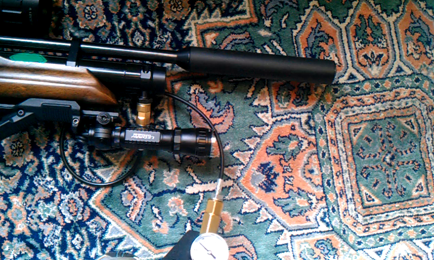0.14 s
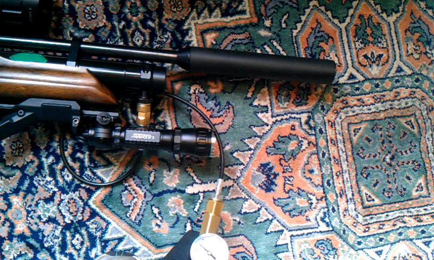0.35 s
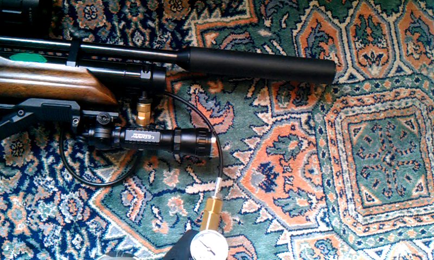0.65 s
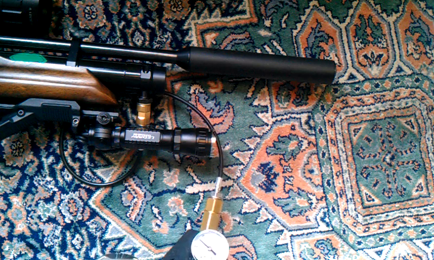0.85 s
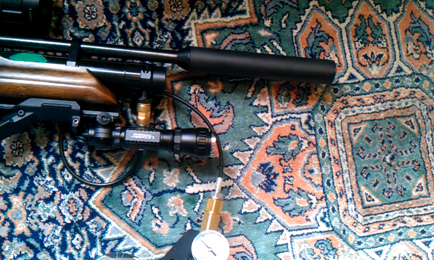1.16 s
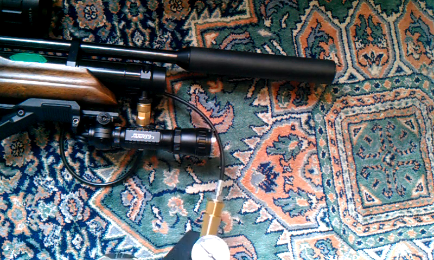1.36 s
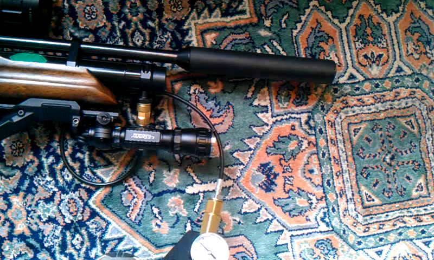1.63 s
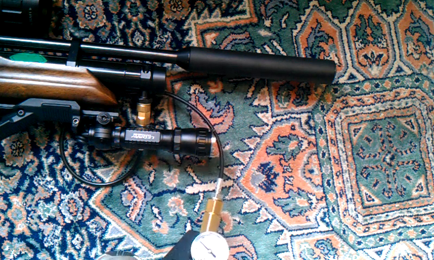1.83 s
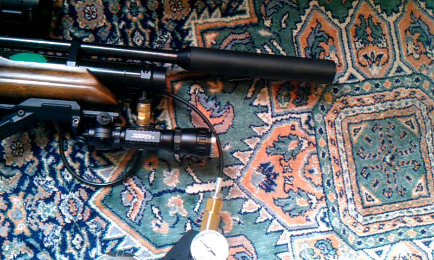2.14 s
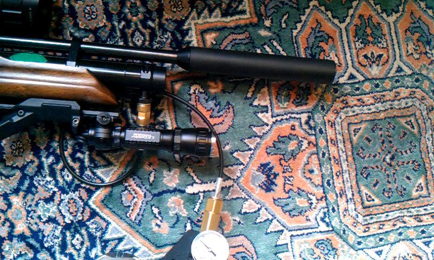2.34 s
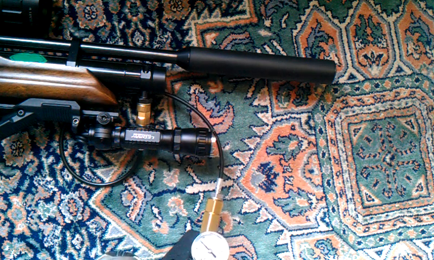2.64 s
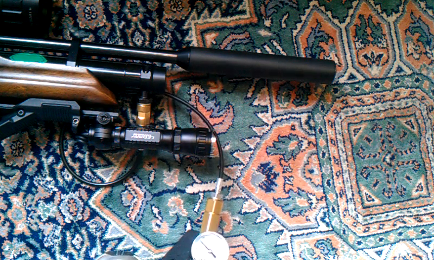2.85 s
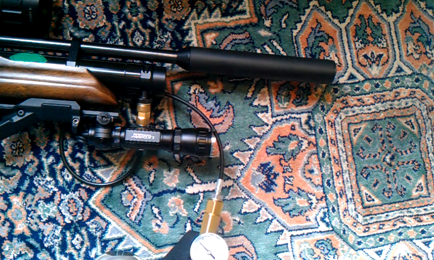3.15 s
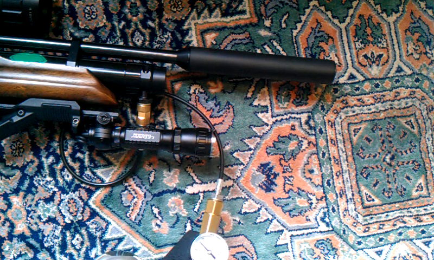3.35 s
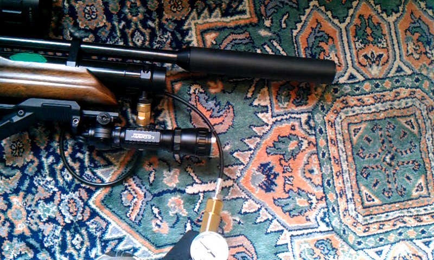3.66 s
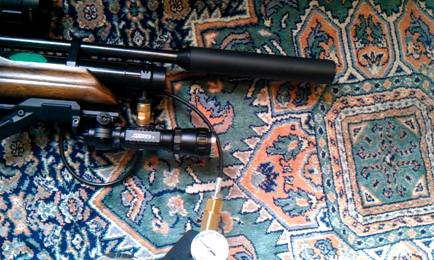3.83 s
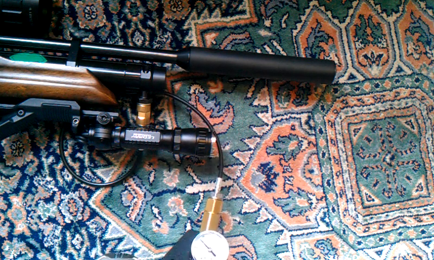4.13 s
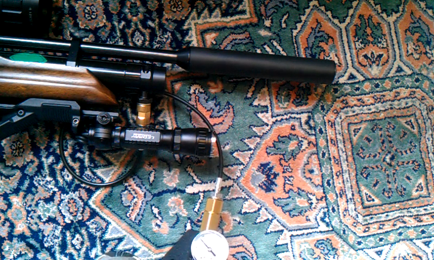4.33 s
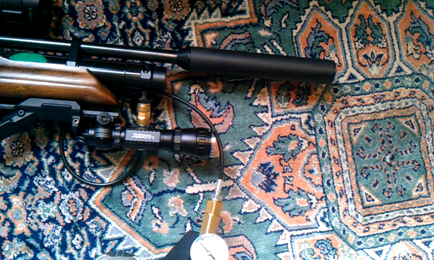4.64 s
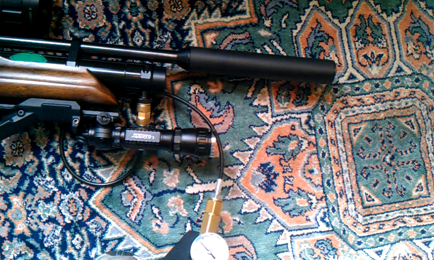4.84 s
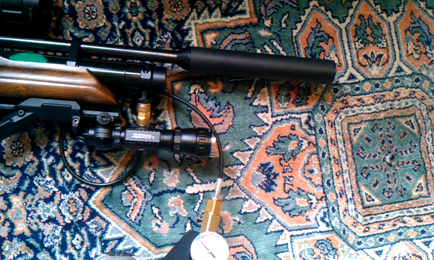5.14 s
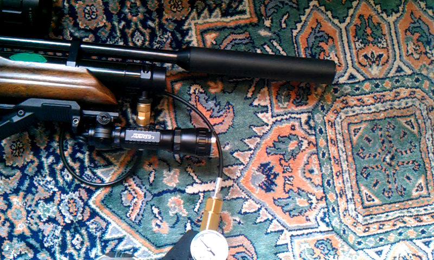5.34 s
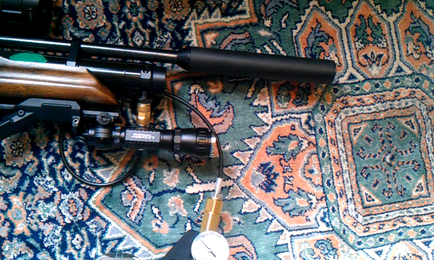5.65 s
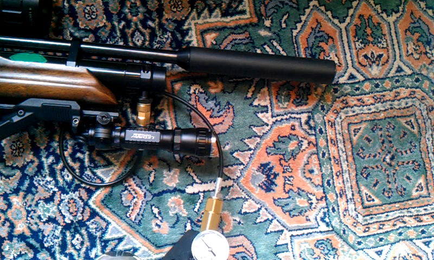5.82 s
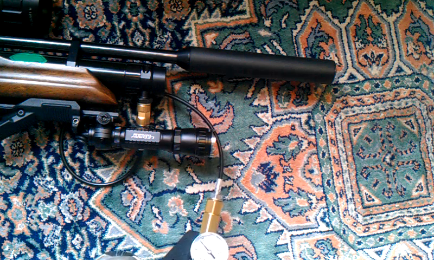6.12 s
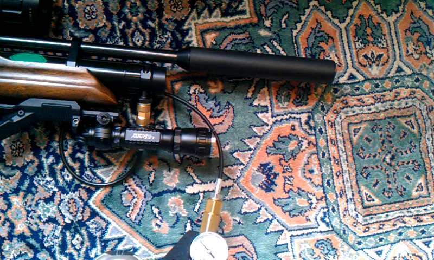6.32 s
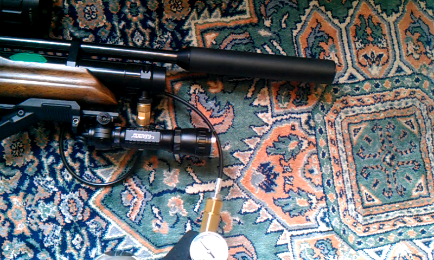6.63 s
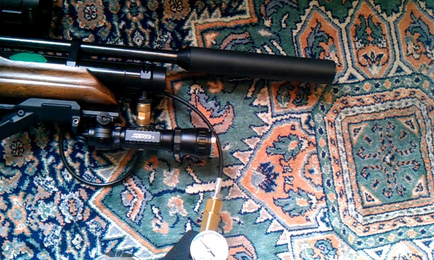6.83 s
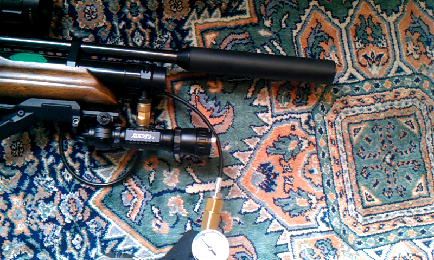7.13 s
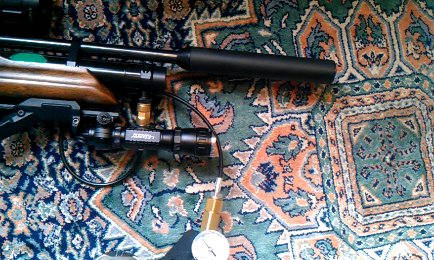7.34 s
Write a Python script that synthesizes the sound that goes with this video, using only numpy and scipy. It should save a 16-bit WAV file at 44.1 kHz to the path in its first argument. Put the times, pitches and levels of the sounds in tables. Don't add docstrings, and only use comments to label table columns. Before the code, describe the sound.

Close up in a carpeted room, a high-pressure hand pump is worked at an even pace. It begins already mid-pull with a rush of intake air. After a quiet pause the push gives a high chirp, a rubbery squeak and a low thump on the floor. Then a valve clacks and bright air hisses again. Five pulls and five pushes follow this cycle, with faint seal rubbing, small ticks and low room rumble between.

```python
import sys
import numpy as np
from scipy import signal
from scipy.fft import rfft, irfft
from scipy.io import wavfile
from scipy.ndimage import uniform_filter1d

SR = 44100
rng = np.random.default_rng(int(sys.argv[2]) if len(sys.argv) > 2 else 0)


def ratio(d):
    e = np.asarray(d, float) / 20
    return 10 ** e


def bounce(signal):
    frames = np.transpose(np.atleast_2d(signal))
    limited = np.clip(frames, -1, 1)
    pcm = np.round(limited * 32767).astype(np.int16)
    wavfile.write(sys.argv[1], SR, pcm)


N = 329868
T = np.arange(N) / SR
SHUT_S = 0.025

# valve opens [t/s], handle tops out [t/s], strength [level/dB], pace [1 = usual]
PULLS = [(-0.11, 0.387, 0.5, 1.042), (1.451, 1.967, 0, 0.98), (3.029, 3.529, 0.5, 1.078),
         (4.585, 5.072, 0.5, 0.99), (6.134, 6.689, 0.5, 1.043)]
# seal breaks loose [t/s], handle bottoms out [t/s], rub [level/dB], dull rub at the bottom [level/dB]
PUSHES = [(1.006, 1.254, -46.5, -45.5), (2.57, 2.83, -47.5, -45.5), (4.133, 4.381, -47, -41),
          (5.673, 5.92, -48, -46.5), (7.258, 7.51, -47, -45)]
# [f/Hz], [level/dB], decay [t60/s]
HOUSING = [(289, -1, 0.12), (377, 18, 0.011), (503, 2, 0.042), (640, -1.5, 0.038)]


def rms_one(x):
    return x / np.sqrt(np.mean(x ** 2) + 1e-20)


def band(x, low_hz, high_hz):
    edges_hz = [low_hz, min(high_hz, .45 * SR)]
    return signal.sosfilt(signal.butter(2, edges_hz, "band", fs=SR, output="sos"), x)


def above(x, hz):
    return signal.sosfilt(signal.butter(2, hz, "high", fs=SR, output="sos"), x)


def drift(rate_hz):
    r = np.exp(-40 * np.pi * rate_hz / SR)
    draws = rng.standard_normal(N // 20 + 2002)
    slow = signal.lfilter([1], [1, -2 * r, r * r], draws)[2000:]
    return np.interp(np.arange(N) / 20, np.arange(len(slow)), rms_one(slow))


def coloured(points):
    hz = np.maximum(np.arange(N // 2 + 1) * SR / N, 1)
    point_hz, point_db = np.transpose(points)
    shape = ratio(np.interp(np.log(hz), np.log(point_hz), point_db))
    return rms_one(irfft(rfft(rng.standard_normal(N)) * shape, N))


def whistle(peaks):
    out = 0
    for hz, width_hz, level_db in peaks:
        r = np.exp(-np.pi * width_hz / SR)
        resonance = [1, -2 * r * np.cos(2 * np.pi * hz / SR), r * r]
        tone = signal.lfilter([1, 0, -1], resonance, rng.standard_normal(N))
        out = out + ratio(level_db + 3.0 * drift(10)) * rms_one(tone)
    return out


def strike(events, modes, spread_db, soft_hz, bounces=((0, 0),)):
    out = np.zeros(N)
    for k, (hz, level_db, t60) in enumerate(modes):
        clicks = np.full(N, 1e-18)
        for lag, lag_db in bounces:
            at = np.round((events[:, 0] + lag) * SR).astype(int)
            chance_db = spread_db * rng.standard_normal(len(at))
            clicks[at] += ratio(events[:, 1] + level_db + lag_db + chance_db)
        r, w = ratio(-60 / (t60 * SR)), 2 * np.pi * hz / SR
        ringing = signal.lfilter([0, np.sin(w)], [1, -2 * r * np.cos(w), r * r], clicks)
        sign = -1 if hz > 1000 and k % 2 else 1
        out += sign * ringing
    soft = np.exp(-2 * np.pi * soft_hz / SR)
    return signal.lfilter([1 - soft], [1, -soft], out)


def in_time(tables):
    s, *columns = np.transpose(np.concatenate(tables))
    gate = sum((T >= rows[0][0]) * (T < rows[-1][0]) for rows in tables)
    curves = [uniform_filter1d(np.interp(T, s, c), size=220) for c in columns]
    return uniform_filter1d(gate * 1., size=220), curves


def pull(start, stop, db, pace):
    # after the valve [t/s], [level/dB]
    flow = [(0, -27), (.01, -37), (.06, -26), (.12, -18.5), (.2, -17.5), (.3, -20.5), (.4, -26), (.5, -35),
            (.6, -46)]
    after, shape_db = np.transpose(flow)
    s = start + after / pace
    s = np.append(s[s < stop], [stop, stop + SHUT_S])
    flow_db = np.interp((np.minimum(s, stop) - start) * pace, after, shape_db)
    core_db = db + flow_db - 463 * np.maximum(s - stop, 0)
    under = flow_db + 17
    lows_db = -18 + (0.31 - 1) * under
    highs_db = -3.5 + (1.06 - 1) * under
    nozzle_db = -13 + (0.73 - 1) * under
    return np.transpose([s, core_db, lows_db, highs_db, nozzle_db])


def jet():
    # [f/Hz], [level/dB per Hz]
    jet_colour = [(150, -92), (250, -25.5), (662, -16.5), (816, -16), (1140, -11), (2130, -10), (2760, -8),
                  (3460, -8), (4900, -3.5), (8550, -3.5), (16000, -25)]
    gate, (core_db, lows_db, highs_db, nozzle_db) = in_time([pull(*row) for row in PULLS])
    air = coloured(jet_colour)
    lows = signal.sosfilt(signal.butter(2, 2700, fs=SR, output="sos"), air)
    highs = above(air, 10300)
    mix = rms_one(air - lows - highs) * ratio(0.81 * drift(2.2))
    mix += rms_one(lows) * ratio(lows_db + 1.1 * drift(12))
    mix += rms_one(highs) * ratio(highs_db + .9 * drift(12))
    mix += ratio(nozzle_db) * whistle([(7500, 650, 0)])
    eddies_db = 0.34 * drift(12.0)
    return gate * ratio(core_db + eddies_db) * mix


def clacks():
    # [t/s], crack [peak level/dB], body [level/dB]
    snaps = [
        (1.4505, -9.5, -45),
        (3.024, -8.5, -44.5),
        (4.585, -9, -45.5),
        (6.129, -10.5, -45.5),
    ]
    # [f/Hz], [level/dB], decay [t60/s]
    valve_modes = [(1120, -12, .01), (2100, -8, .006), (3000, -9, .006), (4420, -9, .007), (5200, -6, .007),
                   (6500, -6, .008), (7400, -1, .008), (8300, -5, .006), (10300, -6, .006),
                   (12600, -10, .005), (14800, -13, .004)]
    rows = np.array(snaps)
    ragged = ((-.0007, -39), (-.0003, -7), (.0002, 8), (.0027, -7))
    crack = strike(rows, valve_modes, 3.0, 15000, ragged)
    body = strike(rows[:, [0, 2]] - [.0018, 0], HOUSING, 1, 1100)
    return ratio(-10) * crack + ratio(10.5) * above(body, 108.8)


def handle():
    # [t/s], [peak level/dB]
    thumps = [(1.251, -26.5), (2.821, -24), (4.361, -21), (5.901, -25)]
    # [f/Hz], [level/dB], decay [t60/s]
    floorboards = [(33, -5, 0.56), (71.5, -4, 0.31), (111.6, -19, 0.22), (140, -2.5, 0.11), (189, 0, 0.036),
                   (313, -15.5, 0.059), (446, -13.5, 0.13), (556, -2.5, 0.036), (680, -27, 0.089)]
    # [t/s], [peak level/dB]
    stops = [(0.366, -30), (1.966, -34), (3.525, -38), (6.683, -37)]
    # [t/s], [level/dB]
    groans = [(1.07, -38.5), (2.633, -42), (4.198, -56), (5.742, -51.5), (7.29, -43)]
    rattle = ((0, -1.5), (.008, -18), (.019, -0.5), (.027, -18), (.055, -42))
    down = strike(np.array(thumps), floorboards, 2.5, 900, rattle)
    shudder = ((0, -13.5), (.02, -11), (.04, -26))
    load = strike(np.array(groans), [(160, 0, 0.27)], 1.9, 300, shudder)
    clatter = ((0, 0), (.005, -4), (.013, -7), (.03, -12))
    knock = above(strike(np.array(stops), HOUSING, 2.5, 900, clatter), 170)
    sway = strike(np.array(stops), floorboards[:2], 0.95, 58, ((.05, 1), (.12, -5), (.2, -6.5)))
    return ratio(-7.0) * down + load + ratio(-8.5) * knock + ratio(-14.5) * sway


def stick_slip(tables, wobble, rough, extra, scratch_db):
    gate, (hz, *levels_db) = in_time(tables)
    on = gate > 0
    phase = (2 * np.pi * np.cumsum(hz * (1 + wobble * drift(42.5))) / SR)[on]
    mean_db = np.mean(levels_db, axis=0)[on]
    scratch = rms_one(band(rng.standard_normal(N), 2040, 6400))[on]
    out = ratio(mean_db + scratch_db) * scratch
    lines = [(k + 1, db[on]) for k, db in enumerate(levels_db)]
    lines += [(k, mean_db + db) for k, db in extra]
    for k, db in lines:
        blur = rough * np.sqrt(k)
        slips = (1 + blur * drift(49)[on]) * np.sin(k * phase + k)
        slips += blur * drift(73)[on] * np.cos(k * phase + k)
        out += ratio(db + 1.5 * drift(20)[on]) * slips / np.sqrt(.5 + blur ** 2)
    gate[on] *= out
    return gate


def outer_seal():
    # [t/s], [f/Hz], length [s], [level/dB], third partial at its top [level/dB]
    chirps = [(1.008, 1867, 0.06, -30, -27.5), (2.569, 1832, 0.062, -32, -38.5),
              (4.138, 1897, 0.044, -31.5, -34.5), (5.678, 1895, 0.0276, -36, -35.5),
              (7.255, 1923, .02, -33.5, -32), (7.278, 2120, 0.017, -41, -25.5)]
    # [t/s], second partial at start, midway, at bottom [level/dB],
    # first partial late [level/dB]
    barrel = [(1.075, -34, -58, -48, -53), (2.635, -36, -54, -43.5, -63), (4.202, -39, -50, -44, -59),
              (5.715, -48, -54, -47, -62), (7.296, -24, -54, -52, -55)]
    tables = []
    for s, hz, length, db, third_db in chirps:
        shares = [0, .007 / length, 0.27, 0.76, 1]
        fades_db = [-10, 0, 0, -11, -33]
        third_fades_db = [-15, -8, -8, 0, -10]
        rows = []
        for u, fade, third_fade in zip(shares, fades_db, third_fades_db):
            pitch = min(hz + 4600 * length * u ** 1.5, 2136)
            rows.append((s + u * length, pitch, db + fade, db + fade - 5.5, third_db + third_fade))
        tables.append(rows)
    barrel_hz, first_db, kick_db = 2087, -58.5, -48
    for (s, early, mid, last, late), (_, bottom, *_) in zip(barrel, PUSHES):
        tables.append([(s, barrel_hz + 35, first_db, early, early - 14),
                       (s + .045, barrel_hz, first_db, mid, mid - 7),
                       (0.2907 * s + 0.698 * bottom, barrel_hz, late, mid, mid - 7),
                       (bottom, barrel_hz, max(kick_db, late), last, last - 7),
                       (bottom + 0.027, 2240, kick_db - 1, last - 22, last - 22)])
    return sorted(tables)


def inner_seal():
    # start [t/s], loudest [t/s], end [t/s], second partial [level/dB], third [level/dB]
    quick = [(1.105, 1.19, 1.253, -33.5, -41), (2.69, 2.757, 2.84, -39, -46),
             (4.245, 4.302, 4.37, -37, -49), (5.75, 5.807, 5.91, -34, -43), (7.313, 7.36, 7.39, -40.5, -46),
             (7.435, 7.464, 7.2, -50, -49)]
    return [[(s, 883, -47, second - 13, third - 5, -54),
             (top, 899, -61, second, third, -53),
             (.4 * top + .6 * end, 905, -56.5, second - 4, third - 1.5, -53),
             (end, 954, -52, second - 18, third - 10, -53)]
            for s, top, end, second, third in quick]


def slow_slips():
    # start [t/s], end [t/s], first partial at its top [level/dB],
    # second at the start [level/dB], third [level/dB]
    slow = [(1.04, 1.124, -45.5, -38, -46), (2.603, 2.705, -47, -36, -45.5),
            (4.14, 4.289, -46.5, -38.5, -52.5), (5.68, 5.787, -44.5, -40, -47),
            (7.266, 7.366, -44.5, -47, -51), (7.367, 7.451, -52, -48, -47.5)]
    sagged_hz = 843
    return [[(s, 876, first - 14, second, third - 8, third - 9),
             (s + .55 * (end - s), sagged_hz, first, second - 14, third, third - 3),
             (end - .015, sagged_hz, first - 6, second - 16, third - 2, third - 6),
             (end, sagged_hz, first - 14, second - 22, third - 9, third - 12)]
            for s, end, first, second, third in slow]


def air_pockets():
    # after its start [t/s], [f/Hz], [level/dB]
    glide = [(0, 2300, -7), (.02, 2500, 0), (.075, 3350, -13)]
    # start [t/s], [level/dB], pitch shift [f/Hz]
    squeezes = [(1.064, -39.5, 0), (2.63, -47, 0), (4.19, -44.5, 0), (5.72, -45, 0), (7.275, -46, -150)]
    return [np.add(glide, (s, shift_hz, db)) for s, db, shift_hz in squeezes]


def seals():
    out = stick_slip(outer_seal(), .008, .6, [(1.5, -13), (2.5, -9), (4, -12), (5, -16)], -6)
    out += stick_slip(inner_seal(), .003, .17, [(1.5, -12), (5, -13), (7, -13)], -11)
    out += stick_slip(slow_slips(), .003, .2, [], -13)
    return out + stick_slip(air_pockets(), .012, .6, [], -14)


def seal_motion():
    # rub, rub at the end, dull, dull at the end, leak at the end [all level/dB]
    rests = [(-63, -59, -58, -68.5, -63.5), (-64, -58, -63, -64, -61.5), (-65.5, -59, -57, -73, -56.5),
             (-64.5, -61, -58, -67, -61), (-62, -57.5, -64.5, -60.5, -57)]
    # [t/s], [level/dB]
    rebounds = [(1.3, -66), (2.88, -62), (4.435, -57.5), (5.981, -64)]
    rub, leak = [], []
    valves = [p[0] - .011 for p in PULLS[1:]] + [9]
    for (_, top, *_), rest, push, opening in zip(PULLS, rests, PUSHES, valves):
        rub_db, rub_end_db, dull_rest_db, dull_end_db, leak_end_db = rest
        start, bottom, db, dull_db = push
        creeping = [(top, rub_db - 1, dull_rest_db),
                    (top + 0.068, rub_db - 1, dull_rest_db),
                    ((top + start) / 2, rub_db, (dull_rest_db + dull_end_db) / 2),
                    (start, rub_end_db, dull_end_db)]
        pushing = [(start, db + 1.5, dull_db - 9),
                   (start + 0.02, db, dull_db - 16),
                   ((start + bottom) / 2, db - 3.5, dull_db - 16),
                   (bottom, db + 1.5, dull_db),
                   (bottom + 0.088, -59.5, -60),
                   (opening, -64.5, -60)]
        rub += [creeping, pushing]
        leak_from_db = -75
        knee_db = leak_from_db + 0.45 * (leak_end_db - leak_from_db)
        shut = top + SHUT_S
        leak.append([(shut, leak_from_db), (shut + 0.24, knee_db), (start, leak_end_db)])
    for (s, db), opening in zip(rebounds, valves):
        leak.append([(s, db), (opening, db - 80 * (opening - s))])
    return rub, sorted(leak)


def rubbing():
    # [f/Hz], [level/dB per Hz]
    rub_colour = [(410, -9.5), (700, -4), (1580, -9), (1820, -7.5), (3460, -8), (4430, -8.5), (6150, -4),
                  (10700, -10.5), (15200, -10.5), (16000, -39)]
    # [f/Hz], [level/dB per Hz]
    dull_colour = [(120, -42), (200, 1.5), (329, 5), (406, -1), (512, 6.5), (1040, -6), (1330, -3.5),
                   (2500, -9.5), (3250, -6), (5500, -120)]
    # [f/Hz], width [Hz], [level/dB]
    leak_peaks = [(5750, 60, 0), (5950, 140, -7), (4400, 160, -9), (6500, 250, -9)]
    moving, leaks = seal_motion()
    gate, (rub_db, dull_db) = in_time(moving)
    leaking, (leak_db,) = in_time(leaks)
    noise = coloured(rub_colour)
    edges = 700 * 2 ** np.arange(0, 4.8, .4)
    patches = noise + sum(.6 * drift(18) * band(noise, low, high) for low, high in zip(edges, edges[1:]))
    grain_db = 1.2 * drift(36) + 1.9 * drift(250)
    rub = ratio(rub_db + 0.5 + grain_db) * band(patches, 200, 11600)
    dull = ratio(dull_db - 1.0 + 0.74 * drift(33)) * coloured(dull_colour)
    return gate * (rub + dull) + leaking * ratio(leak_db + 0.5) * whistle(leak_peaks)


def ticks():
    # [t/s], [peak level/dB], centre [f/Hz], decay [t60/s]
    loose_parts = [(0.377, -21.5, 6170, 0.061), (0.6724, -40, 8830, 0.045), (0.718, -44, 2280, 0.073),
                   (0.8736, -37, 5900, 0.13), (1.2537, -23, 2300, 0.022), (1.304, -30.5, 1850, 0.04),
                   (2.121, -42, 2050, 0.09), (2.162, -36.5, 5500, 0.036), (2.2463, -72, 6050, 0.045),
                   (2.8295, -22, 6800, 0.084), (2.8796, -28, 6700, 0.041), (3.8658, -28.5, 5630, 0.053),
                   (4.0738, -38, 6060, 0.059), (4.368, -22.5, 7060, 0.11), (4.4384, -26, 2750, 0.044),
                   (5.375, -44, 5540, 0.05), (5.6258, -39.5, 5610, 0.11), (5.914, -21, 2190, 0.045),
                   (5.9842, -31.5, 2840, 0.055)]
    out, t = np.zeros(N), np.arange(4000) / SR
    for s, peak_db, hz, t60 in loose_parts:
        noise = rng.standard_normal(4000)
        snap = rms_one(band(band(noise, 1500, 9500), 800, 11000))
        ring = rms_one(band(noise, .85 * hz, 1.2 * hz))
        burst = (snap + .9 * ring) * ratio(peak_db - 12.0 - 60 * t / max(t60, .005))
        at = round(s * SR)
        out[at:at + 4000] += burst * np.minimum(t * 1500, 1)
    return out


def rustles():
    # [t/s], length [s], [f/Hz], [level/dB]
    shifts = [(0.453, 0.18, 1920, -61), (1.343, 0.12, 1900, -59), (5.106, 0.38, 1370, -67),
              (5.32, 0.091, 4400, -58), (6.902, 0.36, 520, -62), (6.997, 0.25, 1860, -66),
              (7.056, 0.13, 4530, -56.5), (7.056, 0.17, 9900, -57)]
    out = ratio(-66.5) * rms_one(above(rng.standard_normal(N), 3000))
    for s, length, hz, db in shifts:
        swell = np.sin(np.pi * np.clip((T - s) / length, 0, 1)) ** .5
        out += swell * ratio(db + 2 * drift(25)) * whistle([(hz, 0.086 * hz, 0)])
    return out


def rumble():
    # [f/Hz], [level/dB per Hz]
    rumble_colour = [(12, -30), (20, 2), (43, -7), (92, -9.5), (167, -11), (230, -14.5), (250, -25.5),
                     (320, -52.5), (550, -120)]
    return ratio(-70 + 3.2 * drift(8.1)) * coloured(rumble_colour)


def room(x, t60, wet_db):
    t = np.arange(SR // 2) / SR
    tail = band(rng.standard_normal(len(t)), 194, 4700) * ratio(-60 * t / t60) * (t > .004)
    tail /= np.sqrt(np.sum(tail ** 2))
    return x + ratio(wet_db) * signal.fftconvolve(x, tail)[:N]


def scene():
    pump = room(jet() + clacks() + handle() + seals() + ticks(), 0.19, -16.5)
    pump += rubbing() + rustles() + rumble()
    pump *= np.minimum(T * 400, 1) ** 2
    return np.stack([pump, pump])


def roll_off(x):
    return signal.sosfilt(signal.butter(12, 16990, fs=SR, output="sos"), x)


def record(dry):
    loud_db = 10 * np.log10(uniform_filter1d(dry ** 2, size=3000) + 1e-12)
    loud_db = np.interp(T - .05, T, loud_db[0])
    lows = signal.sosfiltfilt(signal.butter(4, 210, fs=SR, output="sos"), dry)
    kept = dry - lows * np.clip((loud_db + 24.5) / 3, 0, 1)
    top_cut = signal.ellip(10, .5, 70, 16100, fs=SR, output="sos")
    return roll_off(signal.sosfilt(top_cut, kept))


dry = scene()
out = record(dry)
bounce(out)
```